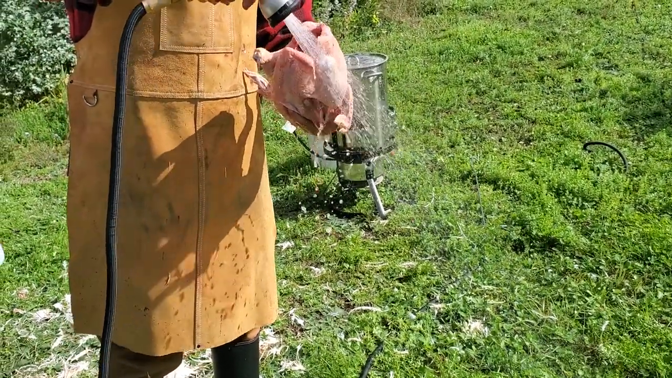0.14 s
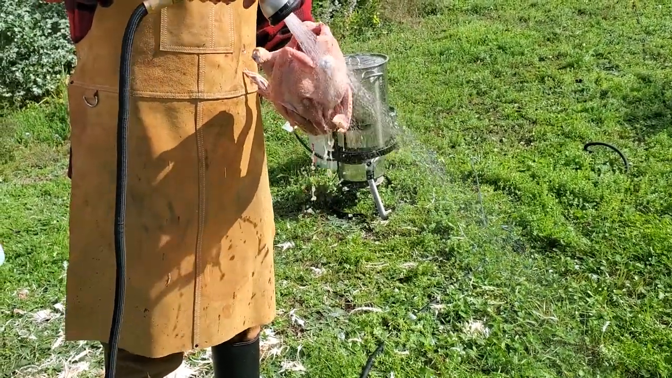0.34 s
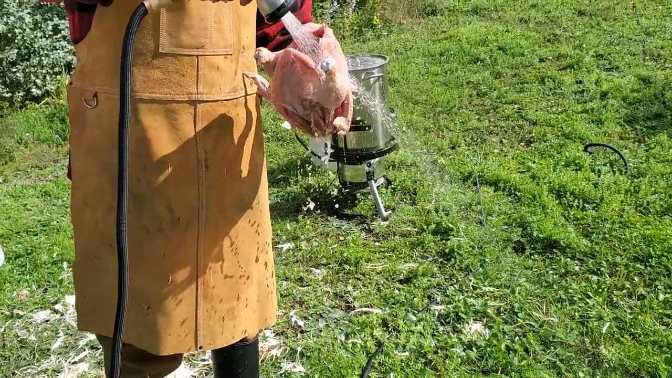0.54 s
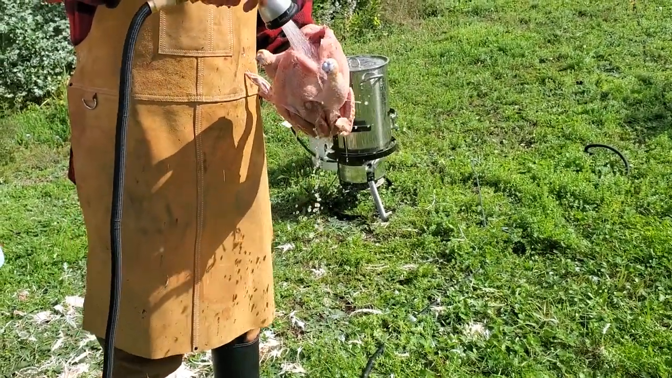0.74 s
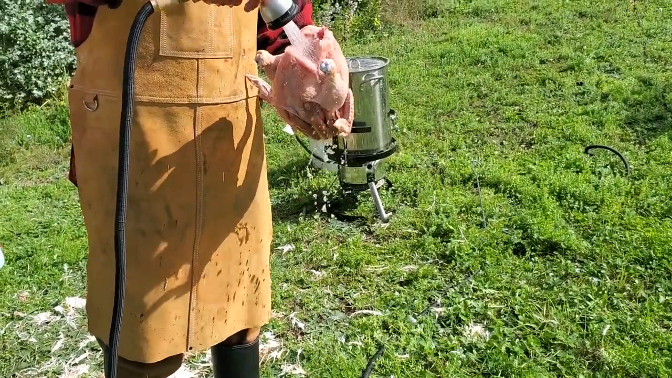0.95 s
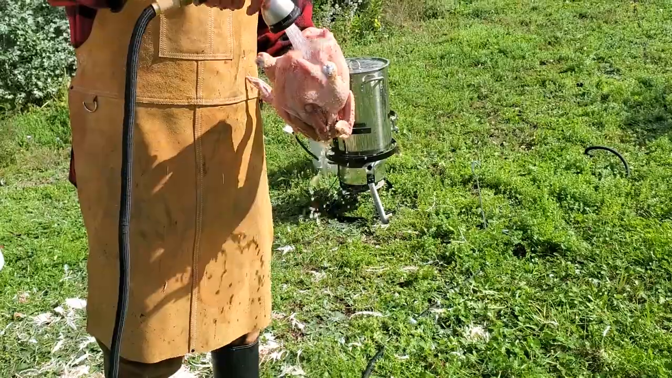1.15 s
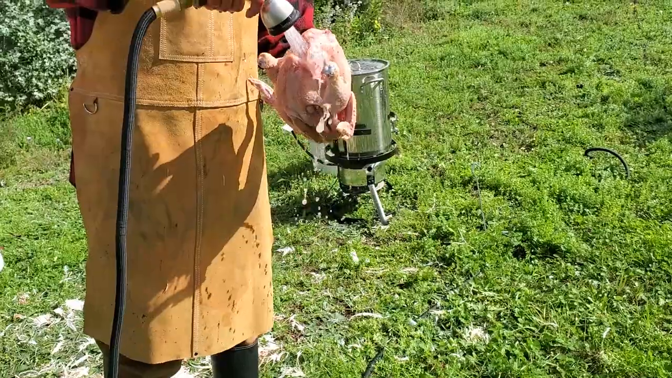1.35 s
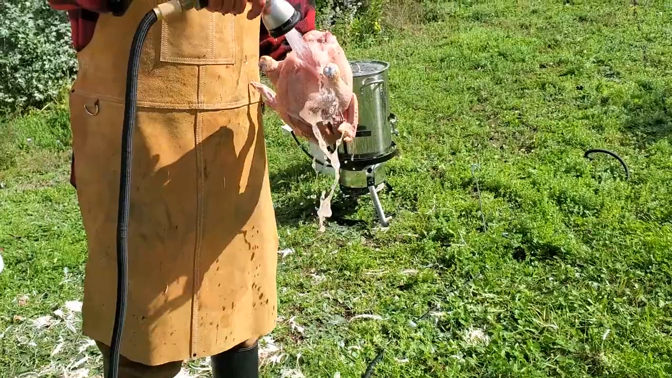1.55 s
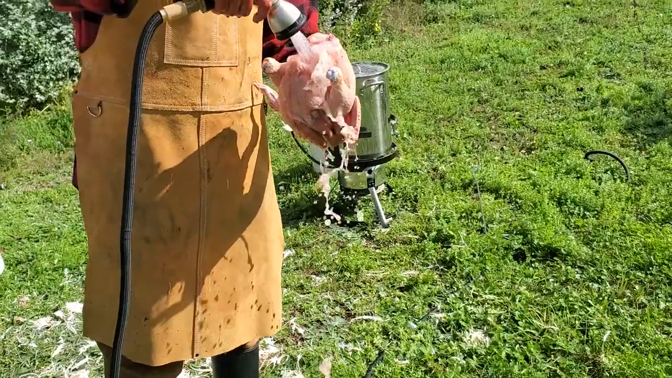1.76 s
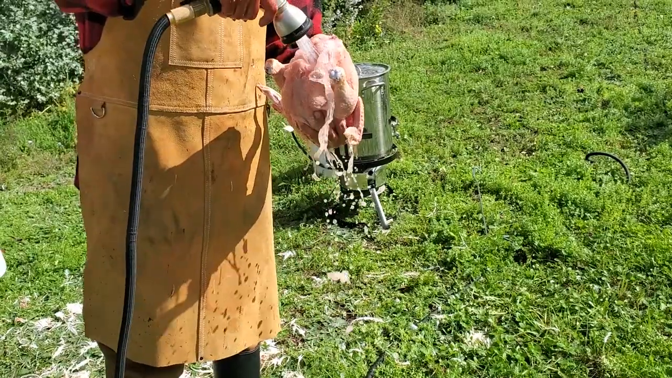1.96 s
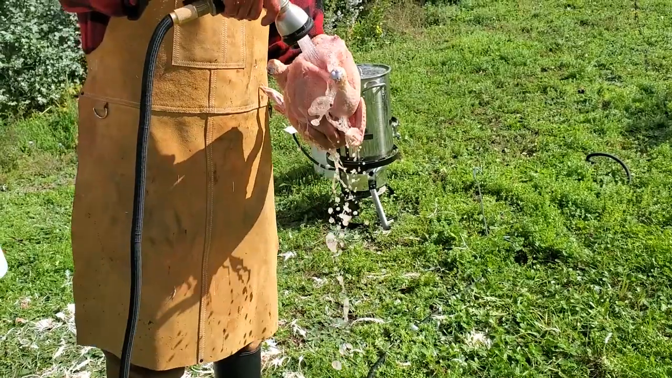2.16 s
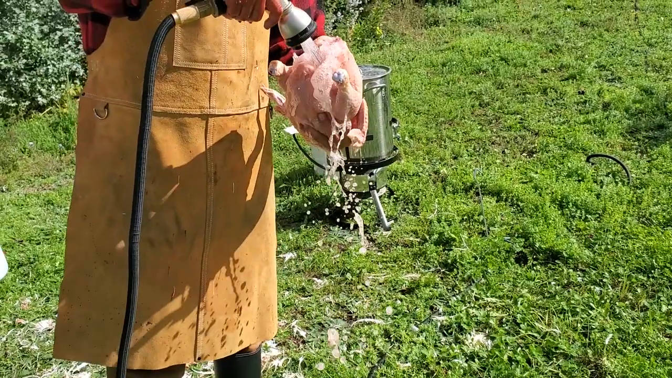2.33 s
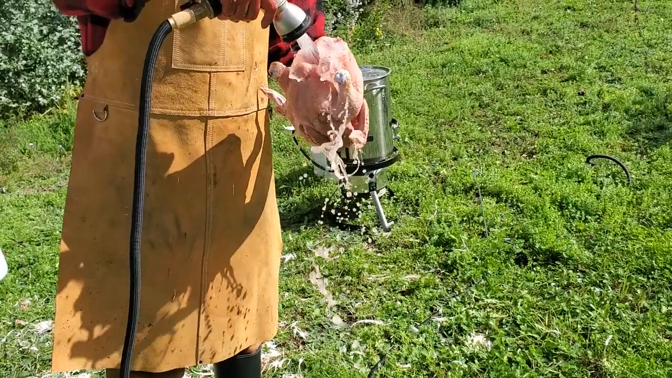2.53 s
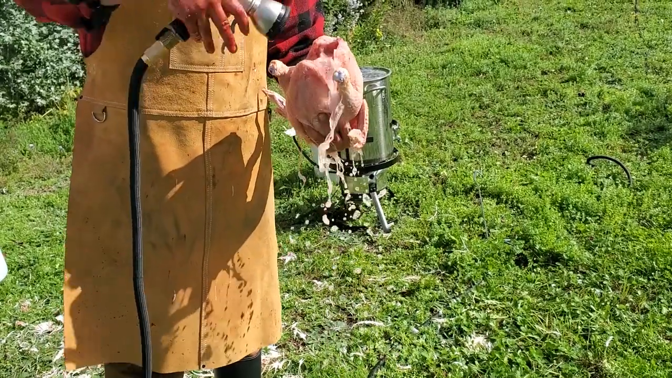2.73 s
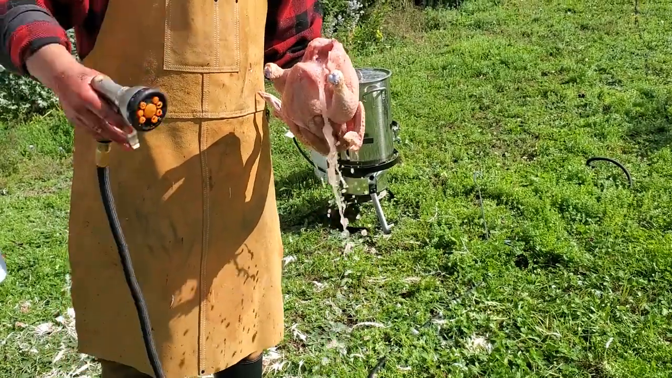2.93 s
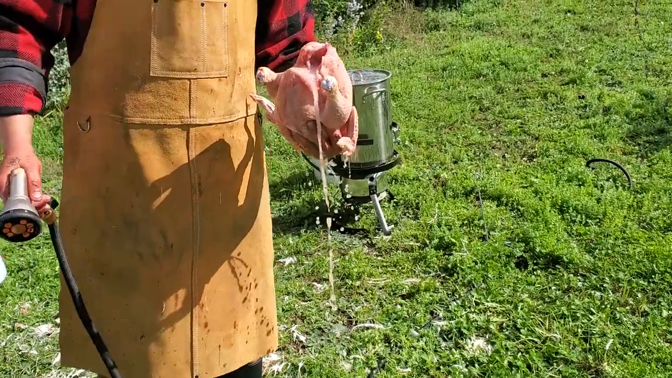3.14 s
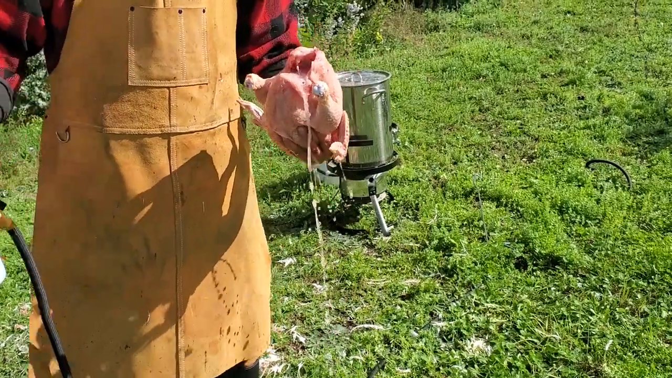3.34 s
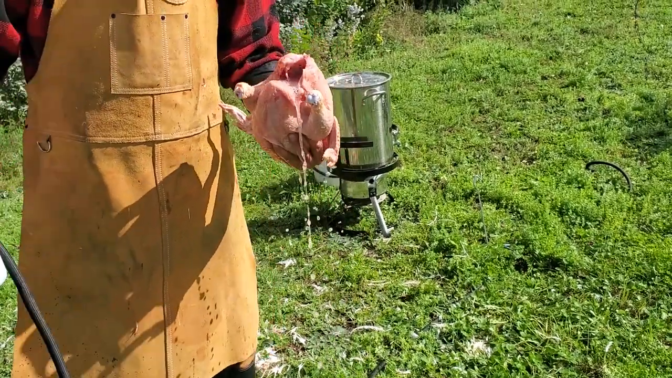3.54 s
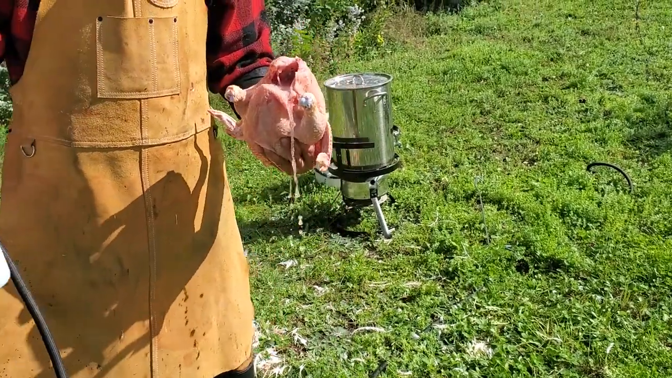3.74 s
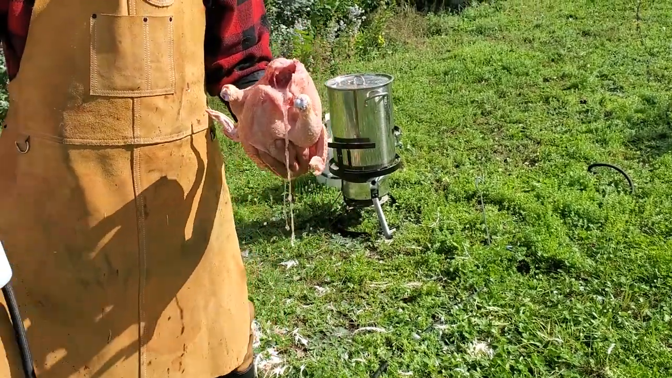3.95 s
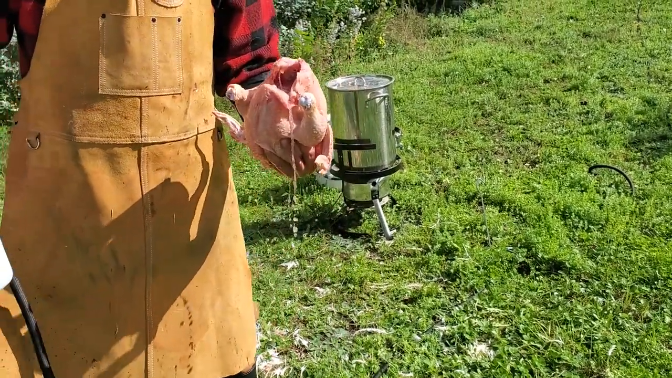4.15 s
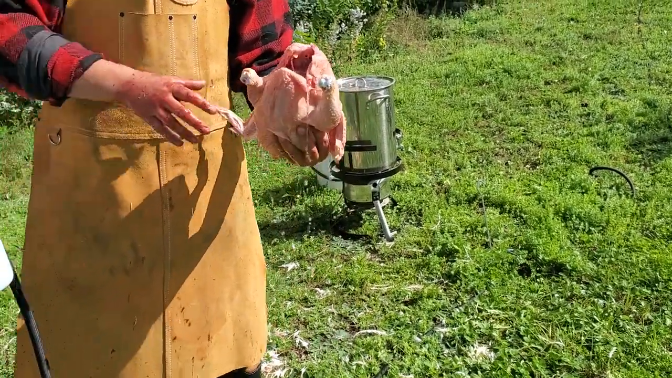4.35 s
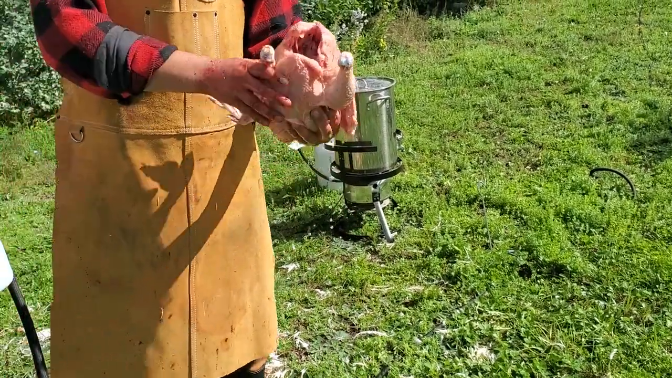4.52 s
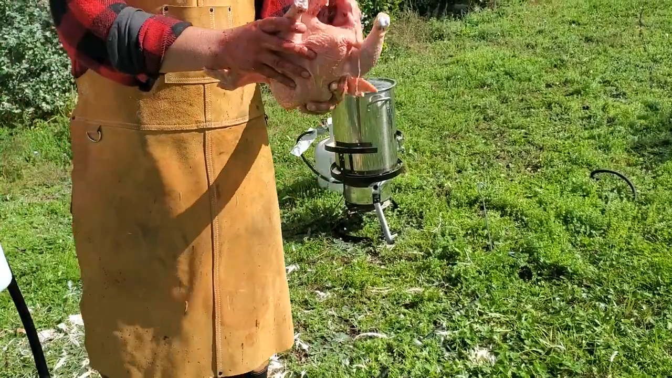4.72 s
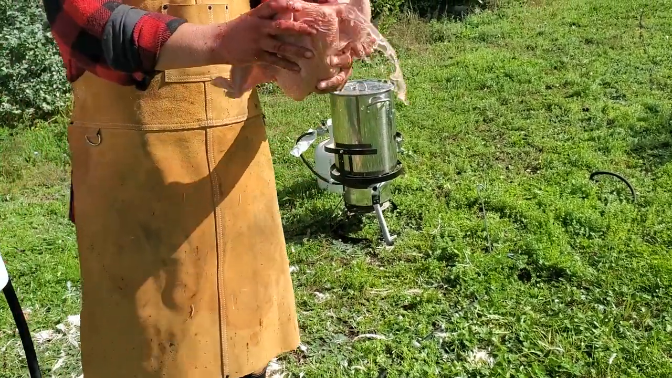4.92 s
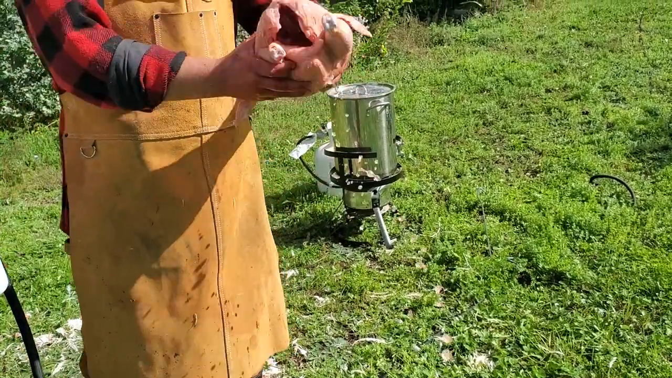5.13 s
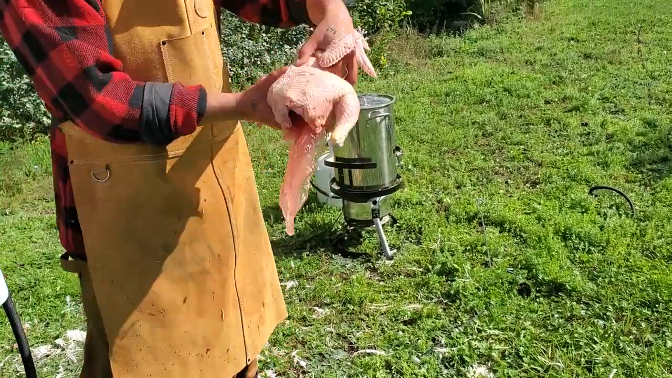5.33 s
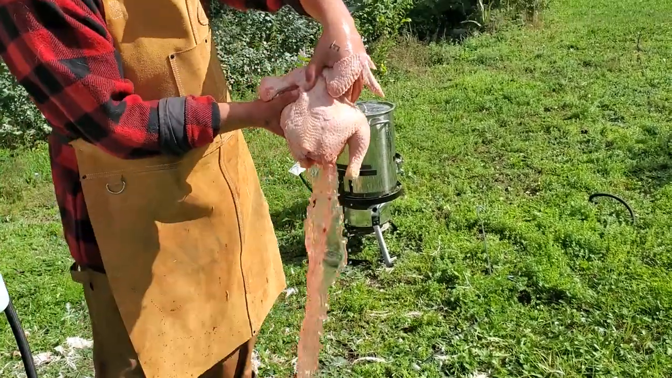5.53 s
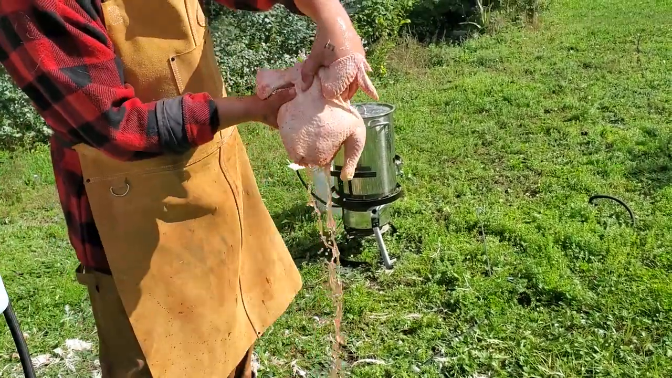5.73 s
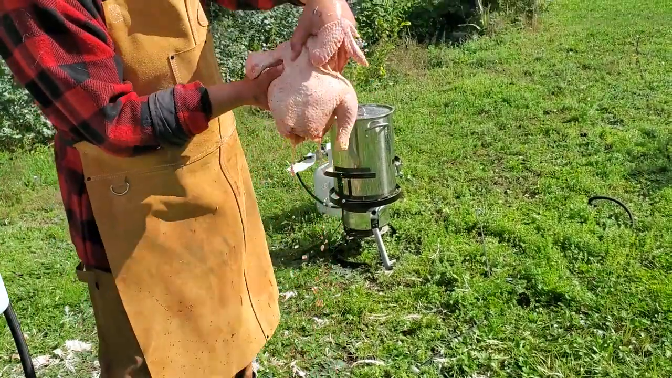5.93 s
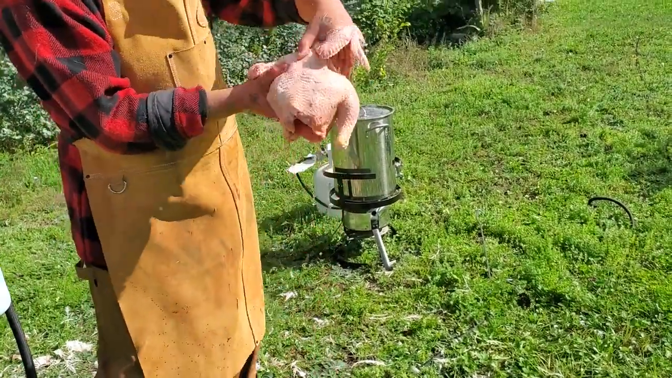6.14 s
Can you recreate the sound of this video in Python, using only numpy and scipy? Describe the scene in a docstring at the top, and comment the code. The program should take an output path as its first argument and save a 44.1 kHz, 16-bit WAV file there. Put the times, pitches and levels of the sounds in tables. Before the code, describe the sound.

Water from a hose sprays into the cavity of a plucked bird with a bright hiss and a hollow, pulsing splash. The spray cuts off, drops patter on wet grass, and the nozzle knocks several times as the hose drags with a brief groan. The dripping thins out, then a short gulping gush splatters on the ground. Uneven wind rumble hits the microphone over a quiet outdoor background with faint distant crickets.

```python
"""A hose nozzle sprays into the hollow of a plucked bird, outdoors: the jet hisses and drives the
cavity's resonances until the valve shuts. The nozzle is put down with a few ringing knocks and the hose
drags with a groan. Water drains and drips on the grass, then pours out in one gush. Throughout, wind
eddies buffet the microphones and crickets pulse far off over a faint background."""
import sys
import numpy as np
from scipy import signal
from scipy.fft import rfft, irfft, next_fast_len
from scipy.io import wavfile
from scipy.ndimage import uniform_filter1d

SR = 44100
rng = np.random.default_rng(int(sys.argv[2]) if len(sys.argv) > 2 else 0)


def materialize(psi):
    """Save the field psi as 16-bit PCM at rate SR to the path in sys.argv[1].

    A 1-D psi becomes a single channel; in a 2-D psi each row is a channel.
    """
    bounded = np.clip(np.atleast_2d(psi).T, -1, 1)
    quanta = np.round(bounded * 32767).astype(np.int16)
    wavfile.write(sys.argv[1], SR, quanta)


N = 276930
T = np.arange(N) / SR
SIDES = np.array([[1], [-1]])  # left, right

# The jet. Each row: time in seconds, hiss level in dB, then the relative drive in dB of the cavity's
# low, main and high modes.
SPRAY_LEVELS = [(0.0, -36.5, -9.5, 0, -16), (0.06, -47, -7, -6.5, -2), (0.44, -42.5, -11, -16, -5),
                (0.455, -38.5, -11.5, -12, -6.5), (0.56, -37.5, -12, -10, -6.5),
                (0.66, -36, -8.5, -12.5, -5.5), (0.76, -35.5, -8, -12.5, -6),
                (0.85, -35.5, -11.5, -7.5, -5), (0.95, -35, -6, -10, -6), (1.15, -36, -7, -6, -6.5),
                (1.23, -36, -7.5, -7, -5.5), (1.3, -34.5, -10, -4, -3.5), (1.37, -38.5, -5.5, -9, -5.5),
                (1.43, -36.5, -7.5, -3, -4.5), (1.49, -37, -7, -8, -4.5), (1.55, -35.5, -11, -5.5, -7),
                (1.61, -37, -6, -6.5, -4.5), (1.67, -36, -8.5, -6, -5.5), (1.75, -35.5, -6, -8, -7),
                (1.95, -36.5, -7.5, -7, -5), (2.04, -35.5, -6, -6.5, -5.5), (2.2, -36.5, -6.5, -6, -5.5),
                (2.6, -39, -5, -5, -3.5)]
# Nozzle hiss, and the jet striking bare skin. Each row: frequency in Hz, spectral level in dB.
HISS_SPECTRUM = [(5290, -41), (9000, -19), (9820, -19.5), (10400, -10.5), (11000, -2), (11500, 2.5),
                 (12600, 1), (12980, -5), (13400, 3), (15000, 3), (16000, 4)]
SKIN_SPECTRUM = [(1200, -9), (2000, -4.5), (3200, 1.5), (4200, -5.5), (6500, -6), (9000, -6)]
# The hollow. Each row: frequency in Hz, nominal width in Hz, gain in dB, signed left-right likeness.
CAVITY_MODES = [(914, 82, -13.5, 1), (1264, 544, -5, 0.33), (1470, 34, -30, -1.2), (1760, 250, -4, 0.59),
                (2305, 317, -1.5, 0.52), (3010, 370, -0.5, 0.83), (3756, 500, -7, 0.0069),
                (3960, 210, -10, 0.1), (4730, 450, -5.5, 0.12), (5370, 240, -3.5, 0.74),
                (6320, 800, -3, 0.42), (7260, 320, -6, 0.93), (9270, 2000, -13.5, 0.81)]
# Cancellation at the hollow's mouth. Each row: frequency in Hz, width in Hz, share removed per pass.
MOUTH_NOTCHES = [(4350, 190, .97), (5000, 110, .92), (5830, 140, .9)]
# Wind on the microphones. Each row: time in seconds, rumble level in dB, relative flutter level in dB.
WIND_LEVELS = [(0.0, -52.5, -2), (0.55, -38, -10), (1.3, -41.5, -7), (2.2, -41, -6.5), (2.85, -36.5, -10),
               (2.97, -31.5, -11.5), (3.35, -34.5, -9.5), (3.385, -20, -20), (3.42, -23.5, -10.5),
               (3.47, -31.5, -2), (3.56, -41.5, 1), (3.62, -52.5, -4), (3.69, -42.5, 6.5),
               (3.84, -50.5, 1.5), (3.98, -33.5, -17.5), (4.24, -39, -3.5), (4.33, -43.5, -15.5),
               (4.55, -44.5, -9), (4.88, -47, -4.5), (4.96, -55, -11), (5.1, -50.5, -4.5), (5.3, -54, -10),
               (5.43, -45, -9), (5.54, -48.5, 1), (5.61, -37, -9.5), (5.67, -47, -10), (5.74, -36.5, -9),
               (5.95, -44.5, -4.5), (6.28, -50, -11)]
# The two bands of wind noise. Each row: frequency in Hz, spectral level in dB.
RUMBLE_SPECTRUM = [(12, -43), (20, -9), (48, 3.5), (75, 5), (220, -18), (290, -43), (480, -120)]
FLUTTER_SPECTRUM = [(90, 2.5), (150, -2.5), (230, -3.5), (400, -6.5), (600, -13.5), (900, -16.5),
                    (1500, -31)]
# Crickets. Each row: pitch in Hz, pulses per second, centre of one pulse in seconds, level in dB.
CRICKET_CALLS = [(7965, 16.89, 5.397, -70.5), (8520, 16.9, 5.145, -75)]
# Their common swell. Each row: time in seconds, gain in dB.
CRICKET_GAIN = [(0, -4), (3.7, -3), (4.1, 1), (4.5, -3), (4.8, 2), (5.05, -3), (5.3, 4), (5.55, 4),
                (6.28, 0)]
# Outdoor background. Each row: frequency in Hz, spectral level in dB.
AMBIENT_SPECTRUM = [(120, -26), (200, -25), (300, -3), (480, -4), (850, -6), (1500, -10.5), (2300, -9.5),
                    (3900, -13), (5700, -16), (8600, -17), (10000, -37), (12000, -50), (16500, -43)]
# The strongest eddies. Each row: centre in seconds, level in dB, left minus right in dB,
# half length in seconds.
EDDIES = [(0.355, -22.5, 0, 0.0021), (0.575, -21.5, -1, 0.012), (0.644, -19.5, 16, 0.0047),
          (0.872, -33, 13, 0.011), (1.053, -24, 4, 0.014), (1.21, -25.5, 8, 0.014),
          (1.251, -20.5, -6, 0.0066), (1.388, -25.5, 0, 0.0095), (1.463, -21, 4, 0.0065),
          (1.597, -28, 10, 0.0041), (1.638, -26, -8, 0.0061), (1.696, -29.5, -1, 0.0079),
          (1.993, -27, 5, 0.0048), (1.903, -29.5, 0, 0.0098), (2.11, -33, 0, 0.022),
          (2.291, -22, -3, 0.015), (2.351, -22, -3, 0.0069), (2.683, -22.5, 19, 0.0051),
          (3.004, -18, 2, 0.0067), (3.086, -13, -4.5, 0.0022), (3.384, -16, 0, 0.0083),
          (3.565, -22.5, 8, 0.0049), (3.953, -16.5, -7, 0.0051), (4.019, -25.5, -3, 0.01),
          (4.066, -26, 10, 0.0057), (4.141, -26, -3, 0.0091), (4.203, -19, -4, 0.0022),
          (4.463, -30.5, 3, 0.014), (4.563, -22.5, 18, 0.0023), (4.648, -32, -9, 0.0034),
          (4.733, -24, 18, 0.0023), (4.803, -27.5, -11, 0.0062), (4.861, -34.5, -6, 0.008),
          (5.041, -35, 0, 0.0095), (5.363, -36, 4, 0.007), (5.467, -26.5, -1, 0.0041),
          (5.519, -27, -12, 0.003), (5.542, -29, -11, 0.0034), (5.59, -23, -7, 0.0042),
          (5.662, -19.5, -5, 0.013), (5.784, -28, -21, 0.015), (5.908, -22.5, 1, 0.0057),
          (5.956, -26, 20, 0.015), (6.157, -31, 3, 0.009), (6.24, -33, -3, 0.01)]
# Big drops, spits and low gulps. Each row: start in seconds, level in dB, ring frequency in Hz,
# seconds for the exciting noise to fall 60 dB.
BIG_DROPS = [(0.594, -24, 1150, 0.036), (0.624, -26, 1150, 0.044), (0.657, -25, 1480, .03),
             (0.972, -18.5, 1110, 0.033), (1.4695, -18.5, 6400, 0.017), (2.288, -18, 1840, 0.035),
             (1.8617, -18.5, 2530, 0.029), (1.911, -19.5, 5450, 0.019), (2.4642, -23, 3780, 0.022),
             (2.518, -16.5, 3700, 0.016), (2.6313, -11, 2530, 0.045), (2.6308, -17, 820, 0.063),
             (2.7355, -32.5, 7040, 0.015), (2.755, -39, 4150, 0.018), (2.8633, -29, 4330, .02),
             (2.8483, -39, 8100, .02), (2.881, -25, 11100, 0.063), (2.889, -21, 6040, 0.052),
             (2.962, -25.5, 6240, 0.02), (3.0202, -18.5, 6700, 0.032), (3.033, -22, 3600, 0.047),
             (3.254, -40, 11000, .02), (3.2918, -36, 11000, .015), (3.126, -30, 7000, 0.018),
             (3.2005, -27, 2370, 0.029), (3.202, -25.5, 4450, .02), (3.2295, -33, 7000, .015),
             (3.097, -30, 6700, .02), (3.156, -34, 4500, .012), (2.799, -29, 6000, .015),
             (2.777, -28, 3800, .02), (3.271, -25, 2710, 0.027), (3.3064, -27, 6490, .02),
             (3.348, -27, 3310, .02), (3.3643, -23, 6800, 0.025), (3.421, -22.5, 2160, 0.019),
             (3.472, -28, 2350, 0.013), (3.5057, -19.5, 4500, 0.012), (3.5405, -24, 6600, 0.02),
             (3.604, -29, 10800, 0.013), (3.663, -29, 3340, 0.028), (3.6751, -20, 7100, 0.011),
             (3.703, -17, 6270, 0.023), (3.7402, -19, 5900, 0.06), (4.226, -36, 11500, 0.028),
             (4.39, -35.5, 457, .04), (4.497, -35, 8000, .015), (4.557, -30, 7500, .015),
             (4.683, -34, 1030, 0.049), (4.735, -40, 990, .03), (4.772, -39, 940, 0.027),
             (4.884, -39, 3800, .02), (4.912, -42, 6300, .02), (5.161, -41, 931, .03),
             (5.516, -28, 172, 0.063), (5.54, -26, 196, 0.1), (5.549, -33, 2270, 0.029),
             (5.58, -31, 208, .08), (5.61, -27.5, 280, 0.09), (5.664, -26, 225, 0.096),
             (5.774, -29.5, 267, 0.068), (5.6458, -30, 6770, .022), (5.654, -27, 6630, .015),
             (5.6745, -18.5, 6800, 0.022), (5.68, -20, 4470, 0.013), (5.692, -29, 4500, .018),
             (5.697, -34, 1010, 0.027), (5.751, -25, 997, 0.037), (5.895, -27.5, 1040, 0.027),
             (5.72, -19, 2530, 0.046), (5.729, -24, 6000, 0.019), (5.7483, -19, 6700, 0.024),
             (5.758, -19.5, 2850, 0.031), (5.79, -23, 2730, .018), (5.8248, -18.5, 6450, 0.028),
             (5.8475, -17.5, 2750, 0.02), (5.872, -18.5, 6500, 0.015), (5.884, -21, 8000, .014),
             (5.897, -22, 2480, 0.026), (5.906, -22, 1810, 0.014), (5.934, -29, 3900, .015),
             (5.946, -30, 2450, 0.028), (5.957, -19, 6050, 0.009), (6.0049, -14.5, 2710, 0.0039),
             (6.035, -21.5, 2440, 0.0097), (6.0774, -26.5, 2500, 0.027), (6.1158, -30, 6830, 0.022)]
# Resonances of wet grass. Each row: frequency in Hz, nominal width in Hz, gain in dB.
TURF_MODES = [(2490, 370, -4), (3950, 780, 4), (4850, 1200, 3.5), (6450, 1100, 2.5), (8550, 720, -11)]
# Water landing on grass. Each row: time in seconds, level in dB, relative level of the fizz in dB.
RUNOFF_LEVELS = [(2.6, -55, -11), (2.7, -50.5, -1), (2.93, -56.5, 0.5), (3.1, -51, 1), (3.5, -46, -9),
                 (3.62, -54, -5), (3.75, -52, -5.5), (4.22, -58.5, 3), (4.28, -56, -4.5),
                 (5.28, -67.5, 5.5), (5.33, -60, 6.5), (5.48, -60.5, 0.5), (5.62, -65.5, 2), (5.64, -55, 6),
                 (5.665, -45.5, -1), (5.676, -47, 6), (5.69, -39, -1), (5.79, -39, -10),
                 (5.86, -39.5, -0.5), (5.94, -42, -2), (5.965, -49.5, 2), (6.04, -46.5, -12),
                 (6.07, -57.5, 4.5), (6.28, -61, 0.5)]
# The plop of that water. Each row: frequency in Hz, spectral level in dB.
PLOP_SPECTRUM = [(290, -48), (500, -23), (607, -7), (673, -25), (737, -6), (1070, 1), (1170, -5.5),
                 (1370, -5.5), (1500, 0), (1850, -1), (2070, -2.5), (2390, 5), (2520, 3), (2940, 4.5),
                 (3390, -2), (3760, -4), (5470, -3.5), (6150, -2), (6640, 3.5), (7660, -4), (8280, -15),
                 (10000, -37), (11000, -5), (14300, -15), (22000, -120)]
# Nozzle and hose knocking. Each row: start in seconds, peak in dB, length factor, tilt in dB per octave.
BLOWS = [(2.63, -28.5, 0.38, -0.5), (3.158, -33, 0.77, -5), (3.189, -25.5, 0.8, -13), (3.203, -34, 0.78, 3),
         (3.355, -23, 1.2, -3), (3.397, -16, 1, -21.5), (3.422, -16, 0.66, -3.5), (3.434, -19, 1, -10.5),
         (3.452, -28, 0.79, -13), (3.53, -25, 1.3, -0.5), (3.545, -27, 1.6, -10), (3.674, -24.5, 0.8, 1.5),
         (3.691, -28.5, 1.4, -31), (3.724, -33.5, 1.2, 1.5), (3.749, -36, 0.47, -1), (3.86, -32, 1.4, -4),
         (3.954, -30, 1, -21), (4.015, -37, 1.5, -10), (4.135, -53, 1.3, -4), (4.196, -35, 1.5, -8),
         (4.561, -47, 1.1, -27), (5.669, -24.5, 0.89, -26)]
# The nozzle's vibration. Each row: frequency in Hz, gain in dB, relative ring time.
NOZZLE_MODES = [(206, -4.5, 0.022), (305.4, 0, 0.13), (437, 5, 0.079), (535, -1, 0.27), (798, 5.5, 0.066),
                (973, 1.5, 0.12), (1410, -2, 0.086)]
# Treble ticks of landing drops, most topping a splat, some alone. Each row: start in seconds, level in dB.
DROP_TICKS = [(2.696, -35), (2.7357, -36), (2.7542, -38), (2.7996, -33), (2.8479, -35), (2.8874, -25),
              (2.9482, -43), (2.9622, -39), (3.0046, -35), (3.0206, -35), (3.1318, -35), (3.1747, -35),
              (3.2006, -39), (3.2121, -37), (3.253, -34), (3.272, -33), (3.2917, -31), (3.3483, -35),
              (3.37, -28), (3.4067, -38), (3.4705, -31), (3.5065, -37), (3.5399, -38), (3.5688, -42),
              (3.5833, -38), (3.6042, -30), (3.6746, -40), (3.692, -35), (3.7384, -45), (3.8262, -41),
              (3.8881, -40), (4.2253, -34), (4.4982, -43), (4.5566, -37)]
# The hose dragging over turf. Each row: time in seconds, pitch in Hz, level in dB.
HOSE_GROAN = [(3.44, 327, -52), (3.46, 280.6, -43), (3.49, 298, -41), (3.52, 399, -35), (3.545, 453, -34),
              (3.575, 400, -52)]


def undb(db):
    """Decibels as an amplitude ratio."""
    return 10 ** (np.asarray(db) / 20)


def unit(x):
    """Normalisation to an rms of 1."""
    return x / np.sqrt(np.mean(x ** 2))


def curves(table):
    """Linear interpolation: a gate open over the table's time span, then each column as a signal."""
    times, *columns = np.transpose(table)
    return [(T >= times[0]) & (T <= times[-1])] + [np.interp(T, times, c) for c in columns]


def colour(x, spectrum):
    """Spectral shaping by (Hz, dB) points, to an rms of 1."""
    hz, db = np.transpose(spectrum)
    size = next_fast_len(N)
    log_hz = np.log(np.fft.rfftfreq(size, 1 / SR) + 1)
    gain = undb(np.interp(log_hz, np.log(hz), db, -90, -90))
    return unit(irfft(rfft(x, size) * gain, size)[..., :N])


def band(x, hz, width_hz):
    """Two-pole resonance, gain 1 at the centre."""
    return signal.lfilter(*signal.iirpeak(min(hz, SR / 2.2), hz / width_hz, SR), x)


def walk(rate, channels=1):
    """Random modulation: levels held 1 / rate seconds and smoothed twice, to an rms of 1."""
    hold = int(SR / rate)
    steps = np.repeat(rng.uniform(-1, 1, (channels, N // hold + 1)), hold, axis=1)[:, :N]
    return unit(uniform_filter1d(uniform_filter1d(steps, hold), hold))


def pair(shared):
    """Partial coherence: left and right noise with a share of their power in common."""
    return np.sqrt(shared) * rng.standard_normal(N) + np.sqrt(1 - shared) * rng.standard_normal((2, N))


def droplets(rate, spread_db, smear_s):
    """Shot noise: the envelope of random impacts of uneven size, each dying exponentially."""
    size = np.minimum(rng.exponential(1, N), 3)
    hits = (rng.random(N) < rate / SR) * undb(spread_db * size)
    power = signal.lfilter([1], [1, -np.exp(-1 / (smear_s * SR))], hits ** 2)
    return unit(np.sqrt(power + 0.12 * power.mean()))


def lag(x, delay_s=3.1e-5):
    """Path difference: sound reaches the right microphone a little later."""
    size = next_fast_len(N)
    shift = np.exp(-2j * np.pi * np.fft.rfftfreq(size, 1 / SR) * delay_s)
    return np.array([x[0], irfft(rfft(x[1], size) * shift, size)[:N]])


def cavity(common, apart, low_db, main_db, high_db):
    """Forced resonance: churning water drives the hollow's modes, which flicker as it sloshes."""
    out = 0
    for hz, width_hz, db, likeness in CAVITY_MODES:
        shared = min(abs(likeness), 1)
        churn = np.sqrt(shared) * common * [[1], [np.sign(likeness)]] + np.sqrt(1 - shared) * apart
        mode = unit(band(band(churn, hz, 1.15 * width_hz), hz, 2.1 * width_hz)) * np.sqrt(width_hz / 1000)
        drive_db = low_db if hz < 2700 else main_db if hz < 3400 else high_db
        out = out + undb(db + drive_db + 1.65 * walk(30.06)) * mode
    for hz, width_hz, share in MOUTH_NOTCHES:
        for narrowing in 1, .5:
            out = out - share * band(out, hz, narrowing * width_hz)
    return out


def spray(inside_s=0.46, filled_s=0.6, shut_s=2.636, throb_hz=8.3):
    """Jet noise: the nozzle hisses while its stream splashes on skin, then excites the hollow."""
    _, hiss_db, low_db, main_db, high_db = curves(SPRAY_LEVELS)
    # Once the hollow has filled, the jet throbs ever more deeply.
    depth_db = 1.5 * np.clip(T - filled_s, 0, None)
    throb_db = depth_db * np.cos(2 * np.pi * throb_hz * (T - 1.672))
    # The closing valve spits once, then the flow dies.
    since_shut = T - shut_s
    spit_db = 11 * np.exp(np.clip(since_shut, None, 0) / 0.0031)
    fall_db = -60 * np.clip(since_shut, 0, 1) / (4 * 0.012)
    hiss = colour(droplets(1400, 1.8, .003) * pair(.93), HISS_SPECTRUM) * undb(.8 * walk(20) + throb_db)
    drops = droplets(1100, 2.5, 0.005)
    common, apart = drops * rng.standard_normal(N), drops * rng.standard_normal((2, N))
    hollow = cavity(common, apart,
                    low_db + 0.044 * throb_db, main_db + 1.14 * throb_db, high_db + 0.82 * throb_db)
    skin = colour(common + apart / 2, SKIN_SPECTRUM)
    inside = np.clip((T - inside_s) / .06 + 1, 0, 1)
    splash = (.3 + .7 * inside) * undb(5.5) * hollow + (1 - inside) * undb(-6.5) * skin
    hose_rush = undb(-53) * unit(band(pair(1.0), hz=666, width_hz=100))
    return undb(fall_db) * (undb(hiss_db + spit_db) * (hiss + lag(splash)) + hose_rush)


def wind(left_bias_db=3.5, veer_db=5.5):
    """Turbulent pressure: eddies rumble and flutter in lumps, more on the exposed left microphone."""
    _, db, flutter_db = curves(WIND_LEVELS)
    pan_db = left_bias_db + veer_db * walk(12)[0]
    lumps_db = 1.5 * walk(15) + 1.5 * walk(25) + 2.3 * walk(30, channels=2)
    rumble = unit(colour(pair(0.088), RUMBLE_SPECTRUM) * undb(lumps_db))
    flutter = unit(colour(pair(.4), FLUTTER_SPECTRUM) * undb(lumps_db + 3.2 * walk(45, channels=2)))
    gusts = undb(pan_db * SIDES / 2) * rumble + undb(flutter_db + 0.061 * pan_db * SIDES) * flutter
    return undb(db) * gusts + buffets(flutter)


def crickets():
    """Amplitude modulation: narrow whistles are gated into steady pulses that swell and fade."""
    _, swell_db = curves(CRICKET_GAIN)
    out = 0
    for hz, rate, pulse_s, db in CRICKET_CALLS:
        cycles_from_pulse = ((T - pulse_s) * rate + .5) % 1 - .5
        gate = np.exp(-(cycles_from_pulse / .12) ** 2)
        whistle = np.sin(2 * np.pi * hz * T + 1.8 * walk(50, channels=2))
        out = out + undb(db + swell_db + walk(4)) * unit(gate * whistle)
    return out


def ambience():
    """Diffuse noise: a faint, wavering background, almost unrelated between left and right."""
    return undb(-51.5 + 1.3 * walk(6.9)) * colour(pair(0.0062), AMBIENT_SPECTRUM)


def buffets(flutter, middle_hz=81.8, scatter=0.33):
    """Pressure transients: an eddy breaking on the housing gives a low swing and a puff of flutter."""
    out = np.zeros((2, N))
    draws = rng.random((len(EDDIES), 3))
    for (centre_s, db, pan_db, half_s), (phase, skew, pitch) in zip(EDDIES, draws):
        hz = middle_hz * (1 + 2 * scatter * (pitch - .5))
        span = slice(max(int((centre_s - .06) * SR), 0), int((centre_s + .06) * SR))
        t = T[span] - centre_s
        puff = undb(-22) * np.exp(-(t / (half_s + 0.0049)) ** 2) * flutter[:, span]
        cycles = hz * t + phase + 0.35 * (skew - .5) * SIDES
        swing = np.exp(-(t / half_s) ** 2) * np.cos(2 * np.pi * cycles)
        out[:, span] += undb(db + np.clip(pan_db * SIDES, -40, 0)) * (swing + puff)
    return out


def splats():
    """Impact excitation: each big drop cracks in the wet grass and rings; low plops hardly crack."""
    out, t = np.zeros((2, N + SR // 12)), T[:SR // 12]
    noises = rng.standard_normal((len(BIG_DROPS), len(t)))
    pans_db = 1 + rng.standard_normal(len(BIG_DROPS))
    spots_db = 4 * rng.standard_normal((len(BIG_DROPS), len(TURF_MODES)))  # each spot has its own timbre
    for (start_s, db, hz, decay_s), noise, pan_db, spot_db in zip(BIG_DROPS, noises, pans_db, spots_db):
        rise = 1 - np.exp(-t / 0.0002)
        crack = noise * rise * np.exp(-np.log(1000) * t / max(decay_s, .004))
        ring = band(band(crack, hz, .16 * hz), hz, .3 * hz)
        turf = sum(undb(gain_db + offset_db) * band(crack, mode_hz, width_hz) / np.sqrt(width_hz)
                   for (mode_hz, width_hz, gain_db), offset_db in zip(TURF_MODES, spot_db))
        contact = band(crack * np.exp(-t / 0.001), hz=6500, width_hz=7000)
        ring, turf, contact = (part / np.abs(part).max() for part in (ring, turf, contact))
        splat = 0.27 * ring + 0.33 * min(hz / 2200, 1) ** 2 * (turf + 0.6 * contact)
        i = int(start_s * SR)
        out[:, i:i + len(t)] += undb(db + pan_db * SIDES / 2) * splat
    return lag(out[:, :N])


def patter(steady_db=-64, grainy_db=-45):
    """Superposed impacts: runoff rains on the grass; big drops plop, fine ones fizz, puddles ring."""
    on, db, fizz_db = curves(RUNOFF_LEVELS)
    # A thin trickle hisses almost evenly; a stronger flow is all separate drops.
    grain = np.clip((db - steady_db) / (grainy_db - steady_db), .3, 1)
    fine = droplets(260, 4.5, .0015) ** grain
    coarse = droplets(300, 7.8, 0.0044) ** grain
    plops = colour(coarse * pair(0.15), PLOP_SPECTRUM) + 0.39 * colour(fine * pair(0.11), PLOP_SPECTRUM)
    noise = pair(0.32)
    gurgle = 0
    for hz, width_hz, gain_db in TURF_MODES:
        ring = unit(band(band(noise, hz, width_hz), hz, 2 * width_hz))
        gurgle = gurgle + undb(gain_db) * droplets(140, 4, .004) ** grain * ring
    flow = on * undb(db + 0.8 * walk(25.1))
    fizz = colour(fine * pair(0.98), [(7500, 2), (9500, 2), (11500, 5), (16000, 6)])
    return flow * (lag(plops + undb(-3) * unit(gurgle)) + undb(fizz_db + 1.5) * fizz)


def knocks(contact_hz=1500, hardness=0.6):
    """Modal vibration: a short rattling push rings the nozzle; glancing blows reach its upper modes."""
    out, t = np.zeros((2, N + SR // 4)), T[:SR // 4]
    noises = rng.standard_normal((len(BLOWS), 3, len(t)))
    rise = 1 - np.exp(-t / (0.0016 * (1 - hardness) ** 2))
    for (start_s, db, length, tilt_db), noise in zip(BLOWS, noises):
        # Rubber and turf blunt the contact, most in the dull blows.
        blunting = signal.butter(4, contact_hz * 2 ** (tilt_db / 12), fs=SR, output="sos")
        envelope = rise * np.exp(-t / (0.0044 * length))
        push = signal.sosfilt(blunting, (noise[0] + .5 * noise[1:]) * envelope)
        ring = 0
        for hz, gain_db, ring_time in NOZZLE_MODES:
            mode = band(band(push, hz, .5 * hz), hz, 4.64 / (ring_time * length))
            ring = ring + undb(gain_db + tilt_db * np.log2(hz / 550)) * mode / np.abs(mode).max()
        i = int(start_s * SR)
        out[:, i:i + len(t)] += undb(db) * ring / np.abs(ring).max()
    return lag(out[:, :N])


def ticks(decay_s=0.0029):
    """Exponential decay: a landing drop ticks with a short puff of treble noise."""
    start_s, db = np.transpose(DROP_TICKS)
    hits = np.zeros(N)
    hits[(start_s * SR).astype(int)] = undb(db)
    puffs = signal.lfilter([1], [1, -np.exp(-1 / (decay_s * SR))], hits)
    return puffs * unit(band(pair(1.0), hz=12600, width_hz=9000)) / 2


def slide():
    """Sliding friction: the hose drags over the turf with a rough tone that groans upward."""
    on, hz, db = curves(HOSE_GROAN)
    rough_hz = hz * (1 + .06 * walk(120)[0])
    phase = 2 * np.pi * np.cumsum(rough_hz) / SR
    return on * undb(db + 4.2 * walk(90)) * np.sin(phase) * np.ones((2, 1))


def scene():
    """Superposition: the pressures of all sources add at the two microphones."""
    return ambience() + spray() + patter() + splats() + ticks() + knocks() + slide() + wind() + crickets()


def record(dry, cutoff_hz=15700):
    """Band limiting: a steep elliptic low-pass removes the highest treble."""
    return signal.sosfilt(signal.ellip(12, .3, 75, cutoff_hz, fs=SR, output="sos"), dry)


dry = scene()
out = record(dry)
materialize(out)
```